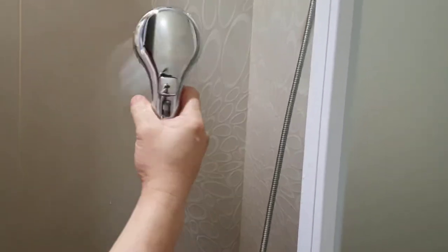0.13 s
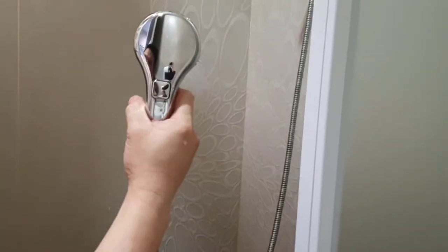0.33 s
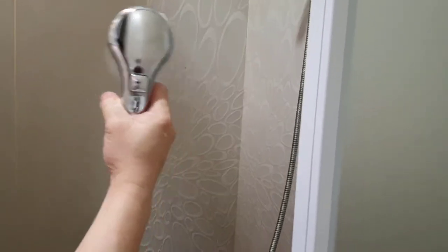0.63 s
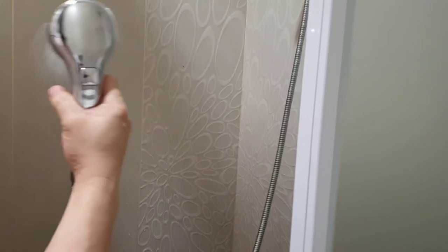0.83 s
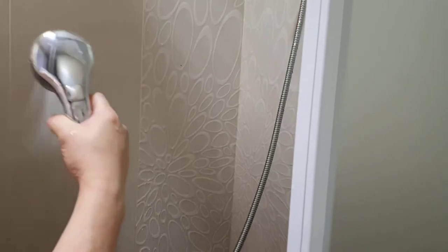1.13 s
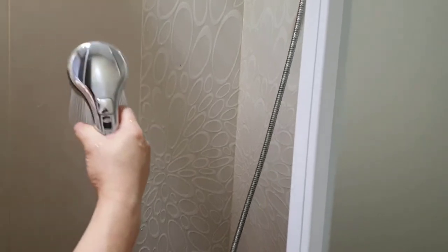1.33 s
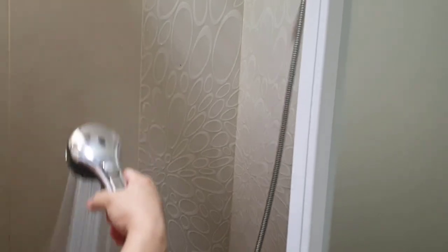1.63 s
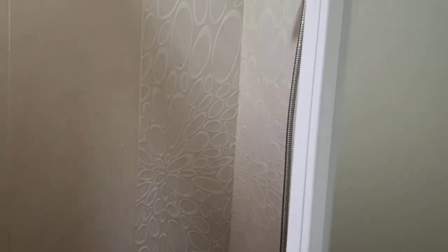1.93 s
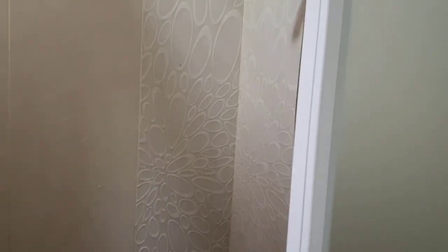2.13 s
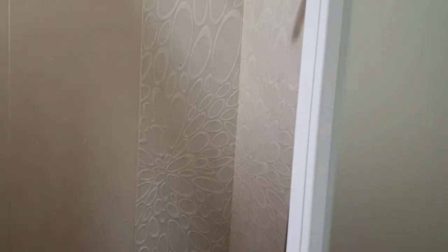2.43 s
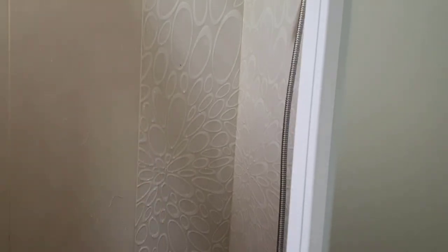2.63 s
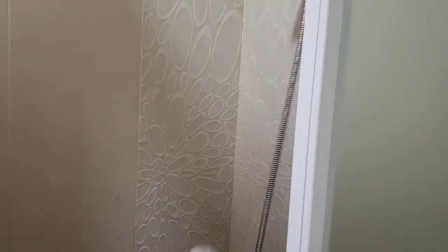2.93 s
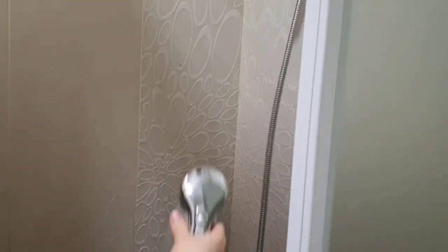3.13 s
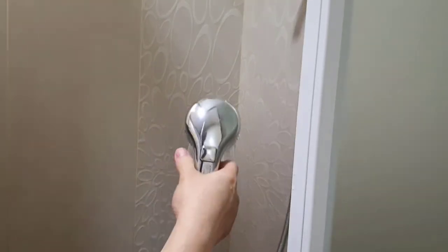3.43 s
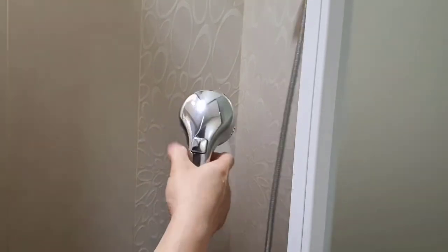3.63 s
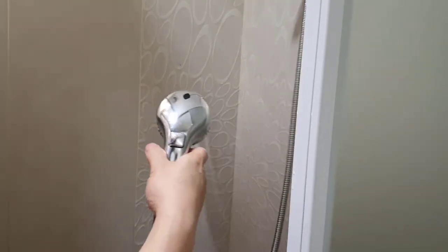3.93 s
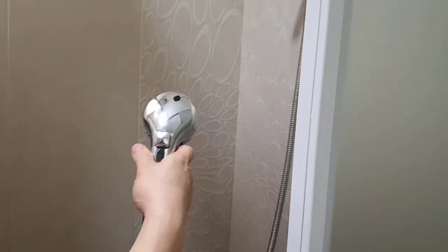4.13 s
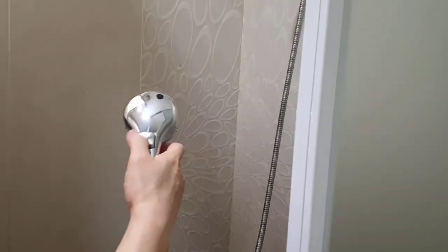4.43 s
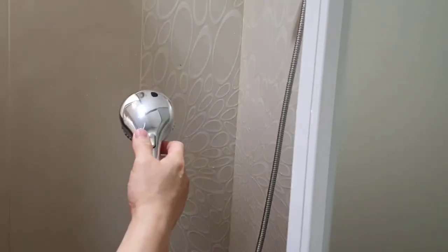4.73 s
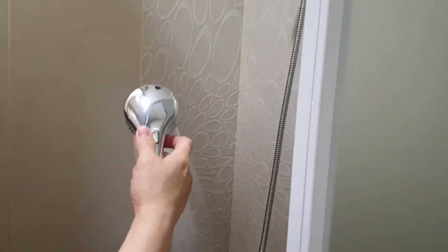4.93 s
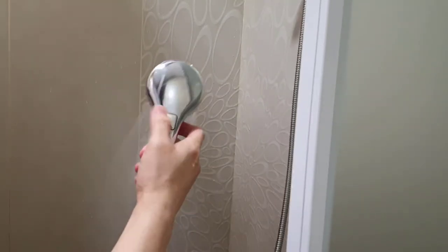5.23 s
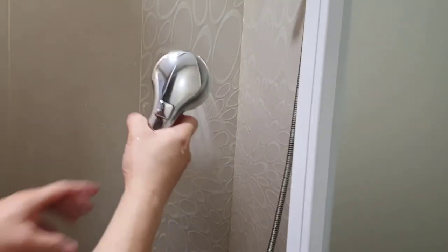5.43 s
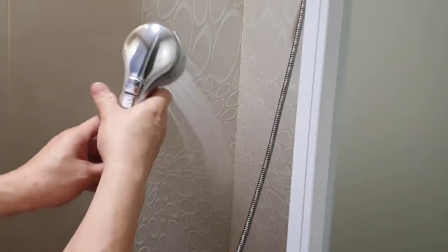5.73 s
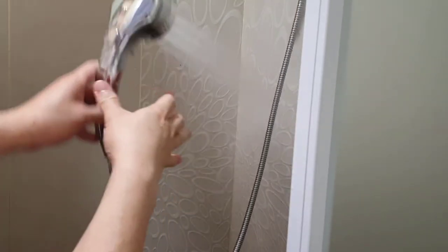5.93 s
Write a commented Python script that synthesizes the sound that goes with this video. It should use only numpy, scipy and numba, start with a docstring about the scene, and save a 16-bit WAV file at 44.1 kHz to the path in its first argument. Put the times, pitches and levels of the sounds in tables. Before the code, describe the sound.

Close in a small tiled bathroom, a handheld shower head sprays with a fine, bright hiss over low extractor fan rumble. As it swings down, the patter grows fuller, the tray rings and jets drum briefly on something hollow. The water collapses to a dribble for most of a second, then spurts back into steady sizzle. Close stereo pickup, short reflections, slightly stronger on the right.

```python
"""A hand-held shower head sprays in a small tiled bathroom, over the steady rumble and hum of an extractor fan.
Random drop impacts, shaped and given short tails, make the hiss at the nozzles and the patter on the tiles.
Swung low, the jets ring the tray and twice sweep over something hollow: impacts through gliding resonances.
The thumb button stops the water for most of a second, then the spray bursts out again.
The fan is filtered noise for rumble and air, with unsteady sines for its motor."""
import sys
import numpy as np
from scipy import signal
from scipy.fft import rfft, irfft, next_fast_len
from scipy.io import wavfile
from numba import njit

SR = 44100
rng = np.random.default_rng(int(sys.argv[2]) if len(sys.argv) > 2 else 0)


def bounce(signal):
    """Save signal as a 16-bit WAV file at the path given by the first command-line argument."""
    frames = np.transpose(np.atleast_2d(signal))
    limited = np.clip(frames, -1, 1)
    pcm = np.round(limited * 32767).astype(np.int16)
    wavfile.write(sys.argv[1], SR, pcm)


N = 268745
TIME = np.arange(N) / SR
BIN_HZ = np.arange(N + 1) * SR / (2 * N)

# fan spectra, shape only: f/Hz, level/dB per Hz
FAN_AIR_SHAPE = [(200, -32), (330, -2), (390, -9), (430, -2), (510, -5.5), (600, -4.5), (800, -6.5),
                 (1150, -11.5), (1750, -11), (2700, -18.5), (3700, -28), (5500, -36), (7500, -34),
                 (9000, -54), (15000, -53)]
FAN_RUMBLE_SHAPE = [(22, -24), (36, -28), (50, -2.5), (66, 2.5), (80, 0), (92, -11.5), (102, -1.5),
                    (116, -9.5), (140, -10), (158, -20.5), (180, -17), (285, -19), (322, -24.5), (480, -84)]
# hum of the fan motor, before it wavers: f/Hz, level/dB
MOTOR_TONES = [(101.0, -39), (179, -58.5), (252, -60), (313, -63)]

# water spectra, shape only: f/Hz, level/dB per Hz
NOZZLE_SHAPE = [(1500, -29), (3000, -24), (4500, -21), (5000, -7.5), (6200, -7), (7900, -4.5), (8600, -8.5),
                (9400, -4), (10300, 0), (11500, 1), (12600, -3.5), (14000, -5.5), (15800, -9)]
PATTER_SHAPE = [(600, -25), (1300, -17.5), (1750, -12), (2150, -4), (2750, -3.5), (3500, -1.5), (4500, 0),
                (5050, 2.5), (6100, -1), (7300, 2.5), (8700, -2), (10700, -4.5), (12500, -27), (15000, -30)]
HOLLOW_SHAPE = [(350, -22), (600, -2), (850, 11), (1350, 0), (2000, 12.5), (3000, 2), (6000, -20)]

# base spray as the head turns: t/s, nozzle hiss level/dB, top sizzle relative to the hiss/dB, patter level/dB
SPRAY_AIM = [(0.0, -30.5, 2, -37.5), (0.22, -32.5, 5, -39.5), (0.55, -33.7, 6, -42),
             (0.88, -35.5, 9, -44.5), (1.08, -33.5, 5.8, -44.5), (1.35, -32.5, 3.5, -37),
             (1.72, -30, 4.5, -32), (1.97, -31, 4.8, -31.5), (2.2, -29, 4.8, -31.5), (2.7, -29.5, 4, -30),
             (3.15, -28, 2.5, -31), (4.0, -31.5, 4.5, -30.5), (4.9, -27.5, 2.2, -33.5),
             (5.28, -28.5, 3.5, -32.5), (5.5, -30.5, 6.3, -35), (5.87, -30.5, 6, -36),
             (6.09, -32.5, 5, -41)]
# swells as the jets swing past a near wall or the emptying head spits:
# t/s, hiss rise/dB, patter rise/dB, half length/s
SPRAY_SURGES = [(0.06, 2, -1, 0.052), (0.37, 3, 0, 0.043), (1.16, 3, 5, 0.028), (1.267, 4, 3.5, 0.049),
                (1.84, 3, 3, 0.056), (3.298, 0.5, 4, .07), (3.76, 1, 0.5, .05), (4.265, 3, 4.5, .025),
                (4.35, 1, 1, .025), (5.95, 2.7, 5, 0.025)]
# the jets catch a hollow surface, in two passes: t/s, peak level/dB, half length/s, central ring f/Hz
HOLLOW_HITS = [(2.699, -39, 0.03, 1400), (2.77, -46.5, 0.03, 1350), (2.892, -51.5, 0.04, 1500),
               (3.235, -48, 0.038, 1180), (3.324, -48, 0.03, 1550), (3.393, -44, 0.022, 1280),
               (3.468, -45, 0.023, 1600)]
# brief ringing where a jet catches an edge or a puddle, and two low knocks near 850 Hz
# from the hollow surface: t/s, ring f/Hz, level/dB, half length/s
SHORT_RINGS = [(1.36, 2820, -47, 0.039), (2.658, 840, -38, 0.024), (2.797, 830, -37.5, 0.023),
               (3.30, 2630, -43.5, .05), (3.45, 1720, -46, 0.028), (4.02, 2100, -44.5, 0.03),
               (4.887, 1960, -44, 0.035), (4.942, 2830, -43, 0.014)]
# the head points down at the tray: start t/s, end t/s, level/dB, central ring f/Hz at that spot
TRAY_PASSES = [(0, 0.3, -50.5, 3300), (1.25, 1.7, -53, 2900), (1.748, 2.45, -40, 3310),
               (2.452, 2.75, -34.5, 3220), (2.75, 3.147, -38.5, 3190), (3.15, 4.1, -39, 3290),
               (4.8, 5.297, -52, 3150)]

# likeness of the noise at the two microphones: f/Hz, likeness 0-1
MIC_LIKENESS = [(60, .98), (130, 0.94), (250, 0.58), (500, 0.7), (1000, 0)]
# balance of the two microphones: f/Hz, right minus left level/dB
MIC_LEAN = [(60, 3.1), (150, 3.3), (350, 0.8), (1500, 1.5), (3500, 1.5), (7000, 3.3), (10000, 2.9),
            (14000, .4)]

# the thumb button: the flow collapses, the head dribbles empty, then the pent-up water spurts out
STOP_S, RELEASE_S = 4.003, 4.86
COLLAPSE_DB_PER_S, OPEN_DB_PER_S = 131, 428
DRIBBLE_DB, DRIBBLE_DB_PER_S = -13, 52.5
LEAK_DB = -35  # lowest flow heard in the patter, relative to full flow
SPURT_DB, SPURT_S = 8, 0.06

DRUM_WANDER = 0.03  # relative spread of the ring as the struck spot shifts
TRAY_WANDER_HZ, TRAY_FADE_S = 45, 0.084  # the fade is counted to each side of an edge
ROOM_T60_S = 0.27
CUTOFF_HZ = 15800


def from_db(db):
    """Decibels to gain."""
    return 10 ** (np.asarray(db) / 20)


def rms_one(x):
    """Scale to rms 1."""
    return x / np.sqrt(np.mean(x ** 2) + 1e-20)


def in_time(rows):
    """The columns of a curve table at every sample."""
    s, *columns = np.transpose(rows)
    return [np.interp(TIME, s, c) for c in columns]


def per_bin(points):
    """A table over log frequency, read at every frequency bin."""
    hz, value = np.transpose(points)
    return np.interp(np.log(BIN_HZ + 1), np.log(hz), value)


def filtered(x, gain):
    """Apply a gain per frequency bin."""
    size = next_fast_len(N, True)
    gain = np.interp(np.linspace(0, N, size // 2 + 1), np.arange(N + 1), gain)
    return irfft(rfft(x, size) * gain, size)[..., :N]


def coloured(x, spectrum):
    """Give a flat excitation a spectrum, keeping its power."""
    return filtered(x, rms_one(from_db(per_bin(spectrum))))


def drift(rate_hz):
    """Slow random wander with spread 1: noise through a two-pole lowpass."""
    step = 40  # samples between drawn points
    r = np.exp(-2 * np.pi * rate_hz * step / SR)
    noise = rng.standard_normal(N // step + 2002)
    slow = signal.lfilter([1], [1, -2 * r, r * r], noise)[2000:]  # drop the filter's start-up
    return np.interp(np.arange(N) / step, np.arange(len(slow)), rms_one(slow))


def swell(s, length):
    """A smooth rise and fall of height 1 around a moment."""
    return np.exp(-((TIME - s) / length) ** 2 / 2)


def air():
    """Unrelated white noise in two channels."""
    return rng.standard_normal((2, N))


def drops(per_s, spread_db):
    """Impacts at random moments, most of them tiny and a few large."""
    sizes = from_db(spread_db * np.minimum(rng.exponential(1, (2, N)), 6))
    signs = np.sign(air())
    lands = rng.random((2, N)) < per_s / SR
    return rms_one(sizes * signs * lands)


@njit
def moving_ring(x, turn, r):
    """A resonance whose angle per sample may glide."""
    y = np.zeros_like(x)
    for i in range(2, x.shape[1]):
        y[:, i] = x[:, i] - x[:, i - 2] + 2 * r * np.cos(turn[i]) * y[:, i - 1] - r * r * y[:, i - 2]
    return y


def ringing(x, hz, width_hz):
    """Pass a flat excitation through a gliding resonance, keeping its power."""
    r = np.exp(-np.pi * width_hz / SR)
    return moving_ring(x, 2 * np.pi * hz / SR, r) * np.sqrt((1 - r * r) / 2)


def fan(rumble_db, air_db, waver_db, wander_rad):
    """Duct rumble and a soft rush of air, returned apart from the slightly unsteady motor tones."""
    hum = 0
    for hz, db in MOTOR_TONES:
        level = from_db(db + waver_db * drift(4.2))
        phase = 2 * np.pi * hz * TIME + wander_rad * drift(1.8)
        hum = hum + level * np.sqrt(2) * np.sin(phase)
    rumble = from_db(rumble_db) * coloured(air(), FAN_RUMBLE_SHAPE)
    rush = from_db(air_db) * coloured(air(), FAN_AIR_SHAPE)
    return rumble + rush, hum


def bathroom(hits, wet_db, count=4):
    """Drops land on different spots; each spot has its own dense, short tail between the tiles."""
    t = np.arange(SR // 2) / SR
    spot, wet = rng.integers(0, count, N), 0
    for k in range(count):
        tail = rng.standard_normal((2, len(t))) * from_db(-60 * t / ROOM_T60_S)
        tail /= np.sqrt(np.sum(tail ** 2, axis=1, keepdims=True))
        wet = wet + signal.oaconvolve(hits * (spot == k), tail, axes=1)[:, :N]
    return (hits + from_db(wet_db) * wet) / np.sqrt(1 + from_db(wet_db) ** 2)


def wall_echoes(x, echo_gain, sway_s):
    """The nearest tiles mirror the water; as the hand moves the delays glide and the hiss shifts colour."""
    out = x.copy()
    for lag_s in (.0017, .0031, .0052):
        lag = lag_s + sway_s * drift(0.583)
        out += echo_gain * np.array([np.interp(TIME - lag, TIME, side) for side in x])
    return out / np.sqrt(1 + 3 * echo_gain ** 2)  # hold the power of direct sound plus three echoes


def drumming(width_hz, thud_db):
    """The jets cross a hollow surface, whose ring shifts with the spot they strike, over a broader thud."""
    force = sum(from_db(db) * swell(s, length) for s, db, length, hz in HOLLOW_HITS)
    ring_hz, = in_time([(s, hz) for s, db, length, hz in HOLLOW_HITS])
    hits = bathroom(drops(per_s=3200, spread_db=1.0) * force, wet_db=-4.5, count=2)
    ring = ringing(hits, ring_hz * (1 + DRUM_WANDER * drift(8)), width_hz)
    thud = from_db(thud_db) * coloured(hits, HOLLOW_SHAPE)
    return ring + thud


def short_rings(width_hz):
    """A clump of drops sets a narrow resonance of whatever it strikes ringing for a moment."""
    rows = np.array(SHORT_RINGS)
    nearest = np.abs(TIME - rows[:, :1]).argmin(axis=0)
    clumps = sum(from_db(db) * swell(s, length) for s, hz, db, length in SHORT_RINGS)
    hits = bathroom(drops(per_s=2500, spread_db=3.0) * clumps, wet_db=-6, count=1)
    return ringing(hits, rows[nearest, 1], width_hz)


def tray(flow, width_hz):
    """Aimed downward, the drops keep one narrow resonance of the shower tray ringing; it wanders with the spot."""
    aimed, ring_points = 0, []
    for start, end, db, hz in TRAY_PASSES:
        inside_s = np.minimum(TIME - start, end - TIME)
        aimed = aimed + from_db(db) * np.clip(.5 + inside_s / (2 * TRAY_FADE_S), 0, 1)
        ring_points += [(start + TRAY_FADE_S, hz), (end - TRAY_FADE_S, hz)]
    ring_hz, = in_time(ring_points)
    hits = drops(per_s=4000, spread_db=2.0) * aimed * flow
    return ringing(bathroom(hits, wet_db=-2.0), ring_hz + TRAY_WANDER_HZ * drift(2.5), width_hz)


def valve():
    """Share of the full flow: a quick collapse and a slow dribble while the button is held, a fast rise on release."""
    held_s = np.maximum(TIME - STOP_S, 0)
    collapse = from_db(-COLLAPSE_DB_PER_S * held_s)
    dribble = from_db(DRIBBLE_DB - DRIBBLE_DB_PER_S * held_s)
    opening = from_db(-OPEN_DB_PER_S * np.clip(RELEASE_S - TIME, 0, 1))
    return np.maximum(np.maximum(collapse, dribble), opening)


def spray(flow):
    """Levels in dB of hiss, top sizzle and patter, from the aim of the head, its swings and the flow."""
    hiss_db, top_db, patter_db = in_time(SPRAY_AIM)
    for s, hiss_rise_db, patter_rise_db, length in SPRAY_SURGES:
        hiss_db = hiss_db + hiss_rise_db * swell(s, length)
        patter_db = patter_db + patter_rise_db * swell(s, length)
    spurt_db = SPURT_DB * np.exp(-np.abs(TIME - RELEASE_S) / SPURT_S)
    hiss_flow_db = 20 * np.log10(flow)
    patter_flow_db = 20 * np.log10(np.maximum(flow, from_db(LEAK_DB)))
    return hiss_db + hiss_flow_db, top_db, patter_db + spurt_db + patter_flow_db


def patter(level_db, flutter_db):
    """Drops burst on wet tile, in clumps as the jets wobble."""
    hits = drops(per_s=9000, spread_db=2.5) * from_db(level_db + flutter_db * drift(42))
    return coloured(bathroom(hits, wet_db=0.0), PATTER_SHAPE)


def nozzles(level_db, top_db, flutter_db):
    """Thin jets break into a mist of droplets: a fine sizzle whose top is beamed and changes as the head turns."""
    mist = drops(per_s=16000, spread_db=2.5) * from_db(level_db + flutter_db * drift(49))
    hiss = coloured(bathroom(mist, wet_db=-3.5), NOZZLE_SHAPE)
    top = filtered(hiss, per_bin([(12000, 0), (13200, 1)]))  # f/Hz, share taken as top
    return hiss - top + from_db(top_db) * top


def microphones(field, centre):
    """Long waves reach both microphones alike, short ones unrelated; the right one gets more."""
    alike, lean_db = np.clip(per_bin(MIC_LIKENESS), -1, 1), per_bin(MIC_LEAN)
    mid = filtered(field[0], np.sqrt((1 + alike) / 2)) + centre
    side = filtered(field[1], np.sqrt((1 - alike) / 2))
    left = filtered(mid + side, from_db(-lean_db / 2))
    right = filtered(mid - side, from_db(lean_db / 2))
    return np.array([left, right])


def scene():
    """Water in the tiled room, with the fan behind it."""
    rush, hum = fan(rumble_db=-33.0, air_db=-49.5, waver_db=2.5, wander_rad=0.75)
    flow = valve()
    hiss_db, top_db, patter_db = spray(flow)
    water = drumming(width_hz=250, thud_db=3.5) + short_rings(width_hz=92) + tray(flow, width_hz=340)
    water = water + patter(patter_db, flutter_db=1.03) + nozzles(hiss_db, top_db, flutter_db=0.55)
    water = wall_echoes(water, echo_gain=0.23, sway_s=0.000197)
    return microphones(water + rush, hum)


def record(dry):
    """The top is cut steeply."""
    return filtered(dry, BIN_HZ < CUTOFF_HZ)


dry = scene()
out = record(dry)
bounce(out)
```